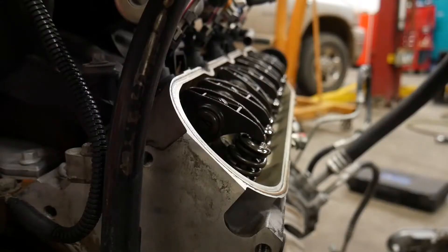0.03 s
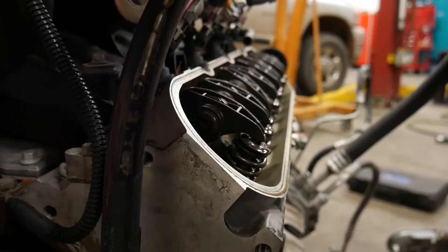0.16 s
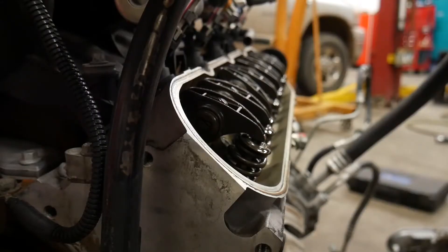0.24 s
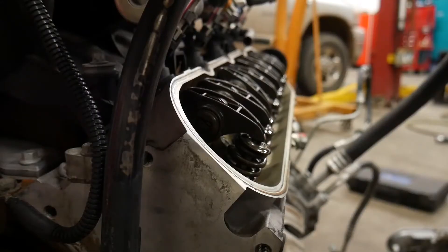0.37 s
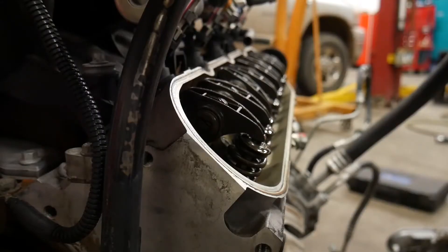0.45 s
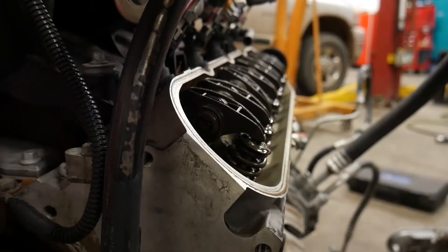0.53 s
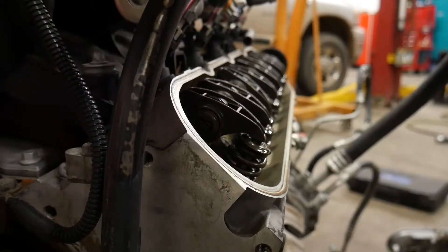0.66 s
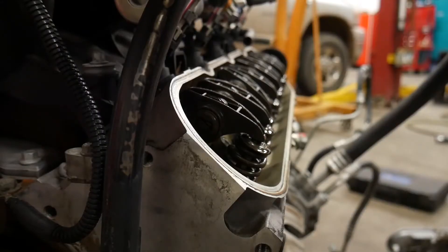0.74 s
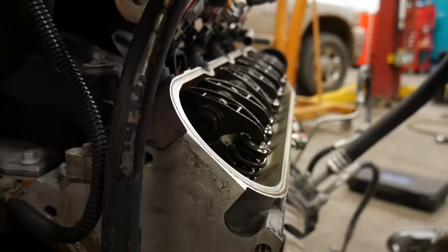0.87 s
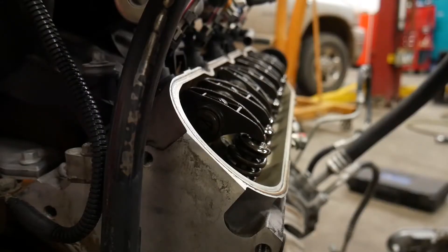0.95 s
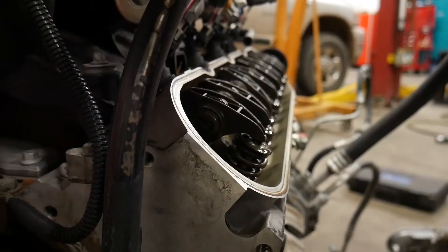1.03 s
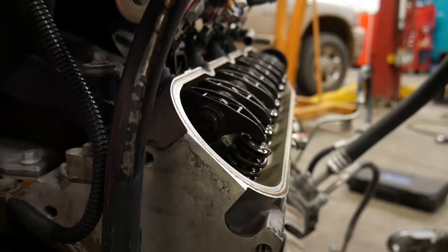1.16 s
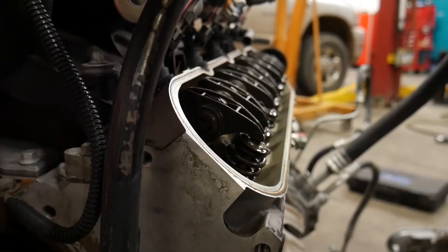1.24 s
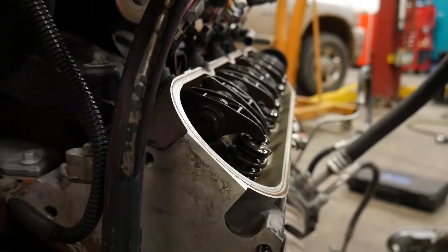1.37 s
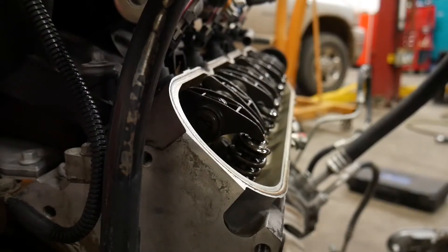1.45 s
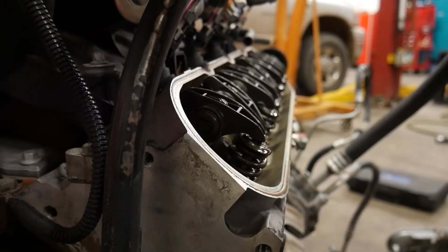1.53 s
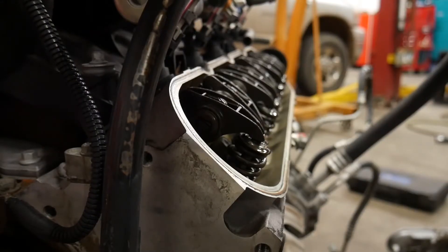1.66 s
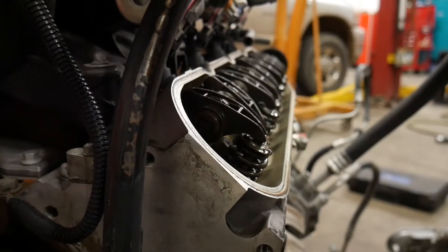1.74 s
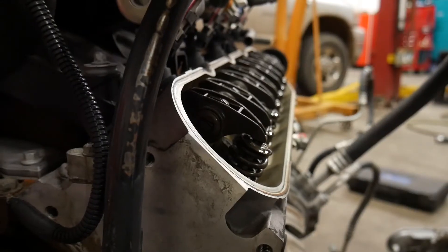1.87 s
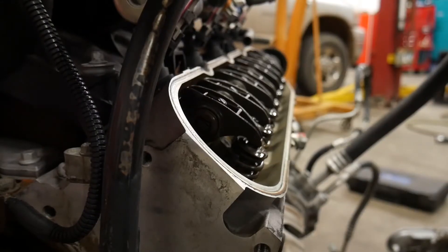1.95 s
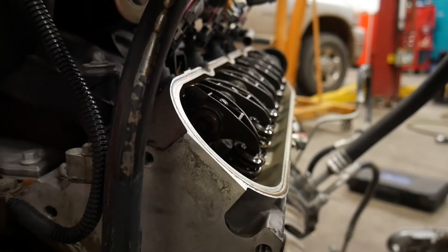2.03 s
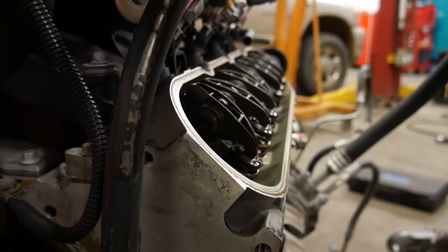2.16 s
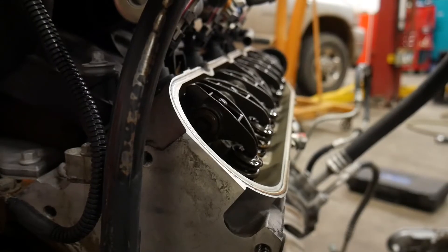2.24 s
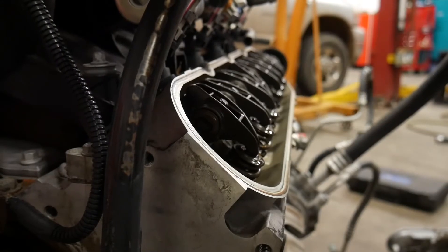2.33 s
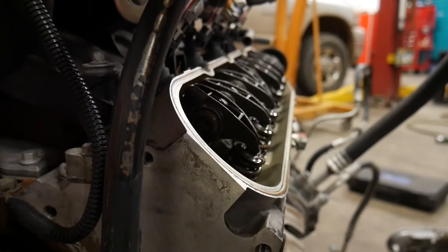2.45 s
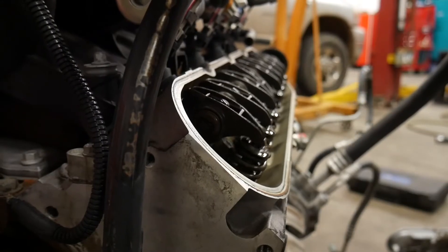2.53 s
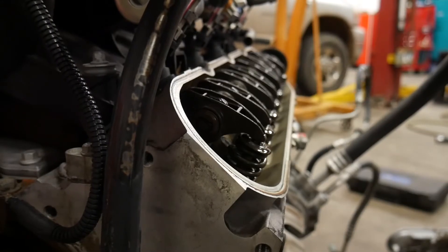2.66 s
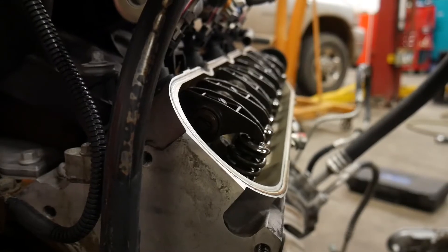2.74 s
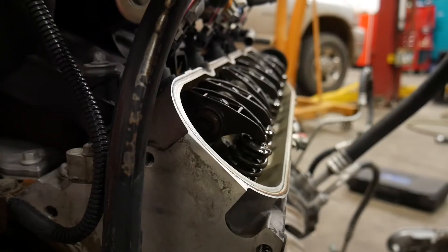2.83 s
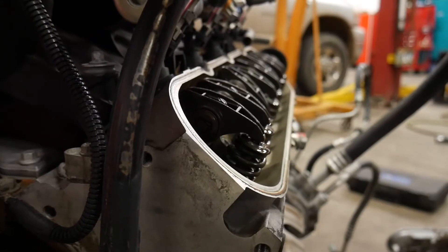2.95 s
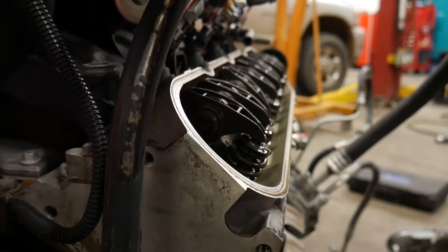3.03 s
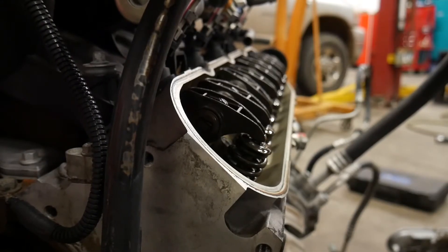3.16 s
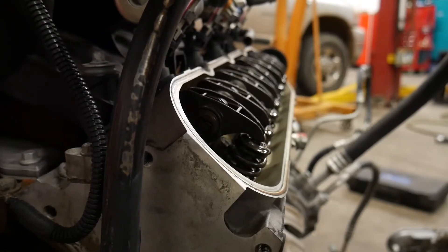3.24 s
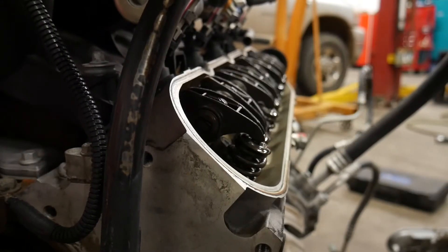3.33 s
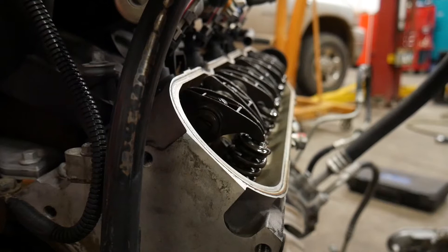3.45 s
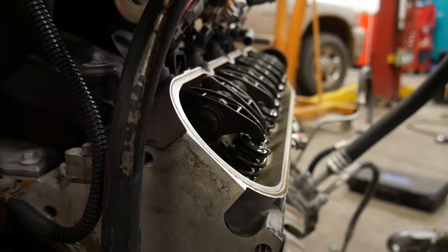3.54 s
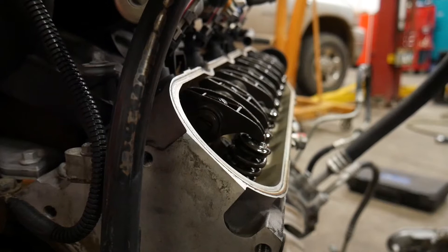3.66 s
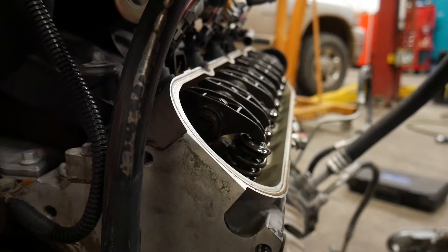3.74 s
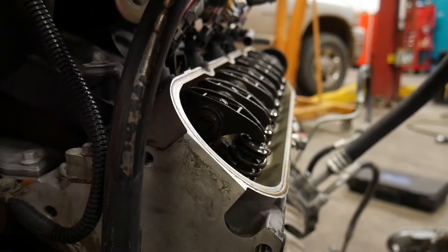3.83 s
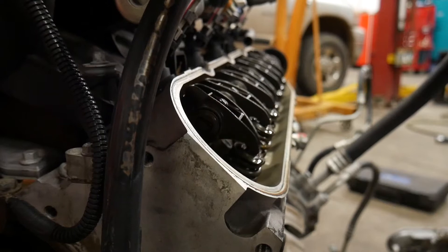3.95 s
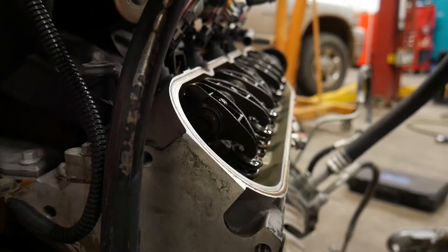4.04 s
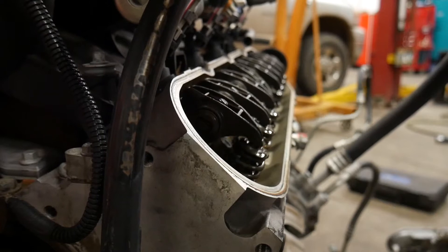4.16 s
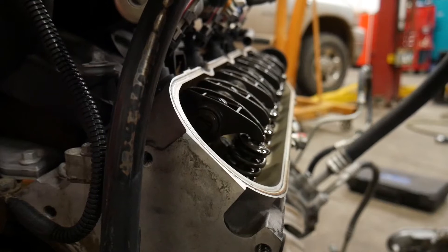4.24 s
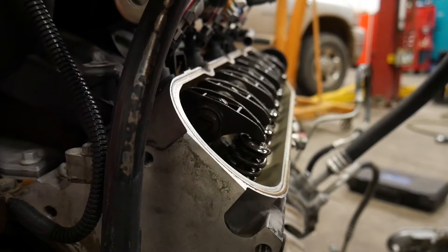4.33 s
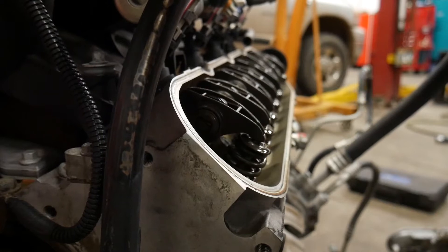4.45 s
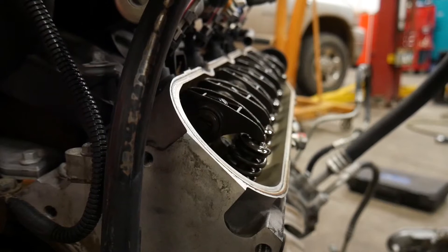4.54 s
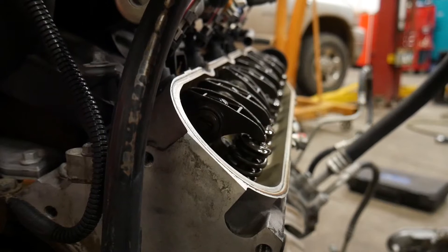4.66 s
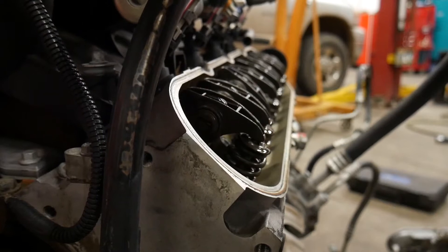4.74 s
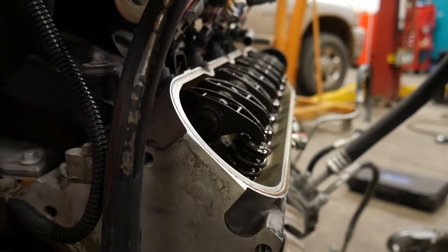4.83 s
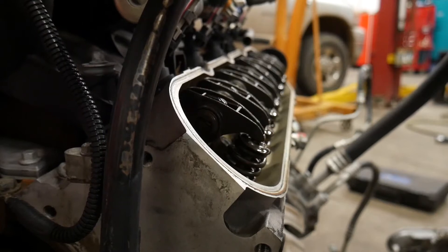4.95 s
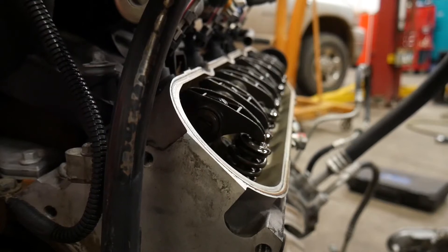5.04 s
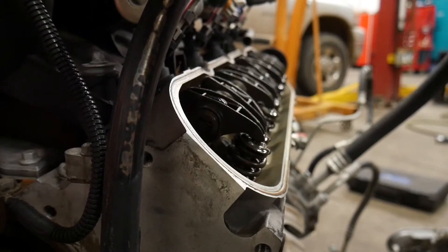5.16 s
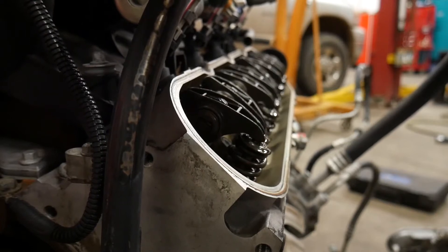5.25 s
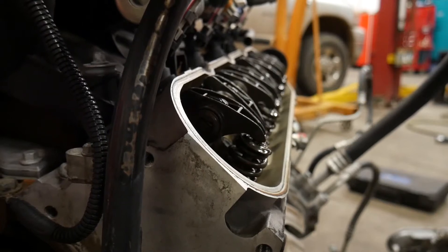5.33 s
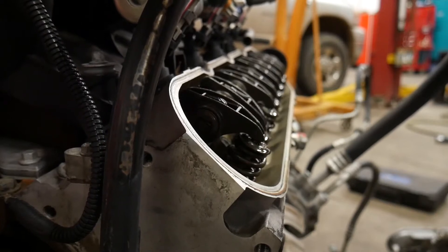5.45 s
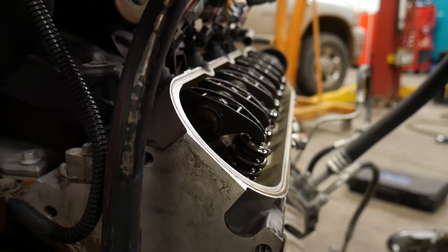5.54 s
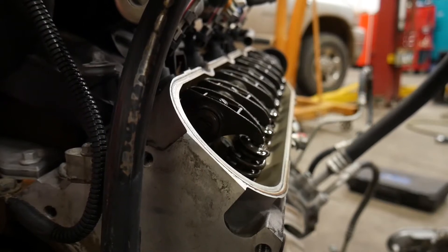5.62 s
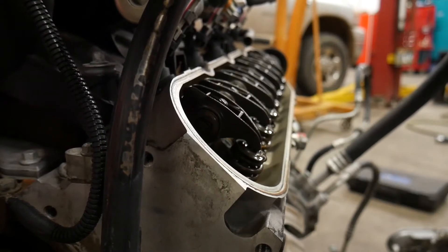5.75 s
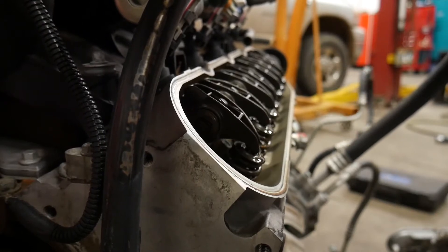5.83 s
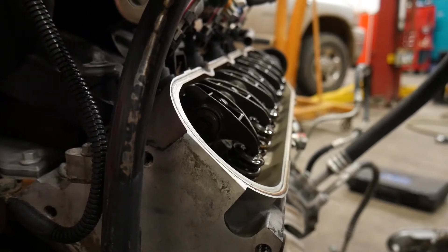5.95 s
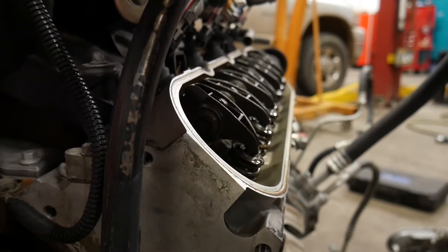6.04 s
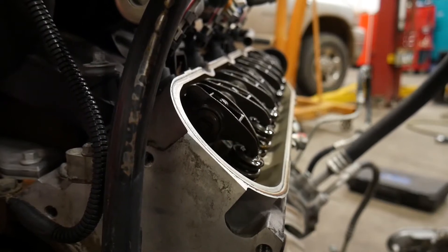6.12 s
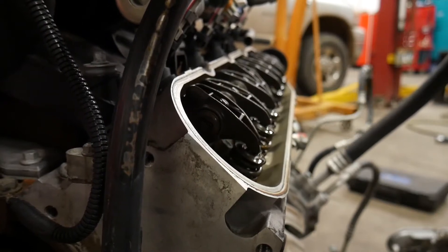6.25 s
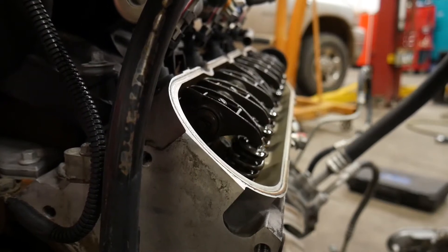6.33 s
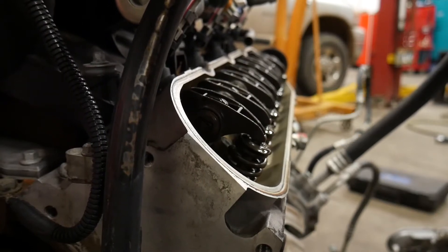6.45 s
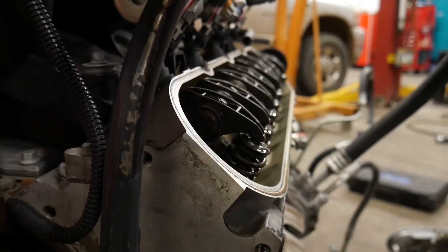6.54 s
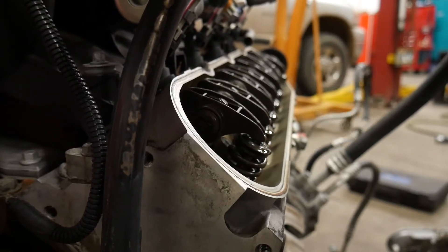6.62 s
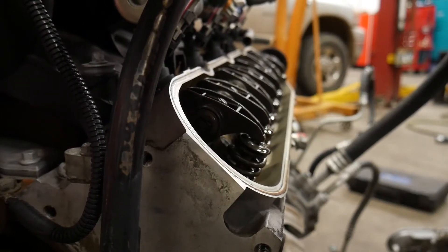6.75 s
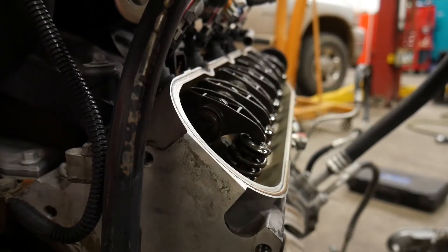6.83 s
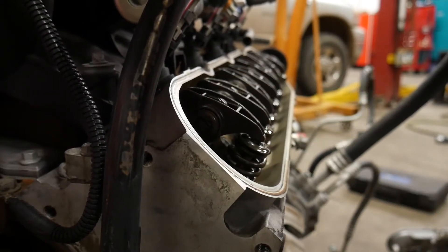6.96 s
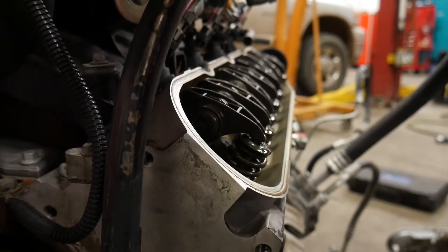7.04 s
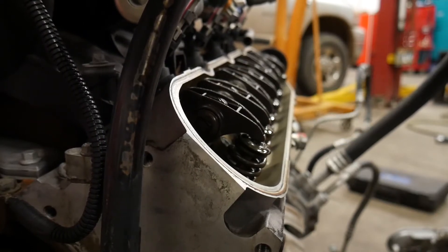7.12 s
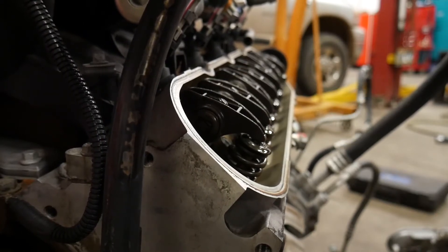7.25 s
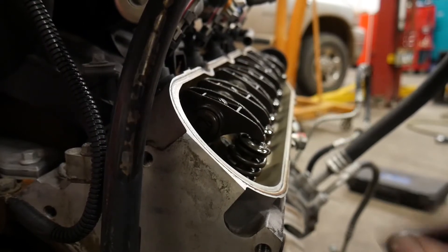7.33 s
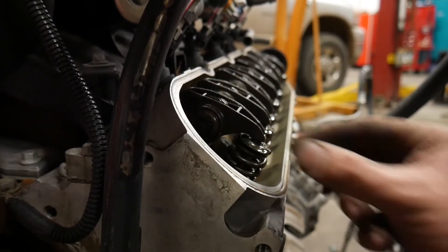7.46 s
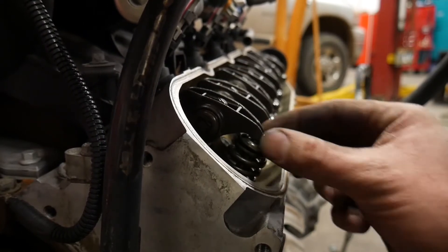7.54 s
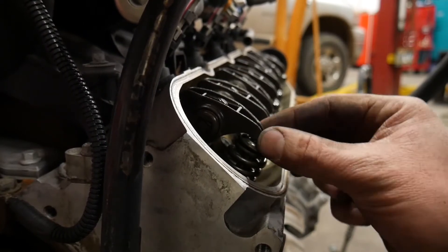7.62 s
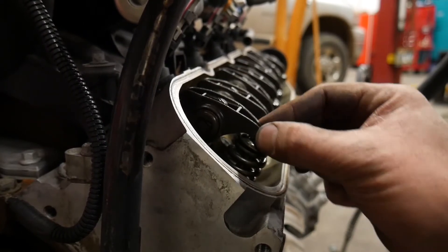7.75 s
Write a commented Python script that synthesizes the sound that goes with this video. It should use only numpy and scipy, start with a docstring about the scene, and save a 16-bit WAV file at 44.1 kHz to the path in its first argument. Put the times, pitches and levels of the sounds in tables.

```python
"""Starter bumps in a workshop

One microphone close to a V8 engine: the starter is bumped eight times and the engine never fires.
Each time the solenoid slams in, the motor whirs up, the solenoid drops out and the gears coast to rest.
Small clicks and a rustle of handling come before and after; behind it all lies the low hum of the shop."""
import sys
import numpy as np
from scipy import signal
from scipy.fft import rfft, irfft, next_fast_len
from scipy.io import wavfile
from scipy.ndimage import uniform_filter1d

SR = 44100
rng = np.random.default_rng(int(sys.argv[2]) if len(sys.argv) > 2 else 0)


def unload_audio(sound):
    """Save the sound as a 16-bit wav file, at the path given as the first command line argument."""
    columns = np.transpose(np.atleast_2d(sound))
    # keep every value between -1 and 1, then stretch to whole-number steps
    steps = np.round(np.clip(columns, -1, 1) * 32767)
    wavfile.write(sys.argv[1], SR, steps.astype(np.int16))


N = 343403
TIME = np.arange(N) / SR

# one row a bump: solenoid in/s, solenoid out/s, top gear mesh rate/Hz, slam/dB, drop-out clack/dB,
# running level/dB, dry friction as a mesh rate/Hz
BUMPS = [(1.0531, 1.174, 1083, -10.5, -19.5, -0.44, 1128), (1.7276, 1.883, 1237, -10, -20, -0.37, 944),
         (2.487, 2.633, 1231, -10.5, -20, -0.6, 899.3), (3.1538, 3.308, 1276, -10, -23.5, -0.55, 901),
         (3.8663, 4.038, 1357, -10, -18.5, -0.54, 900.4), (4.618, 4.741, 1172, -9.5, -20.5, -0.7, 898.4),
         (5.3219, 5.444, 1157, -10.5, -19, -0.5, 973.6), (6.1393, 6.271, 1140, -9.5, -18.5, -.9, 959)]


def starter(mesh, current, level_db, run_db=-24.5, knee_hz=600, bright_hz=2200, bright_db=-0.62,
            patchy_db=0.94, clatter_db=-0.09):
    """The gears sound through the starter case, louder and brighter with speed and current."""
    # broad colour of the running starter: f/Hz, level/dB
    whirr = [(40, -30), (130, -19.5), (300, -19.5), (600, -16.5), (1100, -13), (2000, -18.5), (3500, -14.5),
             (6000, -17), (9000, -15), (12000, -19.5), (15500, -26.5)]
    # resonances of the case and bell housing: f/Hz, width/Hz, lift/dB
    resonances = [(177, 93, 5), (384, 80, 6.5), (477, 49, 7.5), (678, 58, 4), (801, 62, 7.5), (902, 46, 6),
                  (1159, 137, 9.5), (1225, 98, 7), (1302, 72, 9), (1424, 58, 7.5), (1575, 110, 10),
                  (1834, 160, 5), (1990, 220, 5.5), (2242, 158, 8.5), (2610, 40, 3), (2900, 74, 8.5),
                  (3330, 33, 5), (4400, 65, 2), (5200, 160, 8.5), (6590, 170, 7), (8130, 140, 8),
                  (8400, 1400, 3), (9700, 180, 11.5), (10440, 140, 9.5), (11360, 210, 6.5)]
    # harder tooth blows sound brighter: f/Hz, power of the blow strength that the amplitude follows
    speed_law = [(100, 1.4), (500, 1.1), (1200, 1.33), (2400, 1.82), (5000, 2.48), (9500, 2.8),
                 (14000, 3.35)]
    # change at full motor current: f/Hz, level/dB
    loaded = [(100, -4), (450, 2), (780, 8.5), (1200, 3), (2400, 5), (5000, 2), (9000, -1), (14000, 2.5)]

    def case_db(hz):
        """Resonant peaks on top of the broad colour."""
        return read(whirr, hz) + sum(db / (1 + (2 * (hz - f) / width) ** 2) for f, width, db in resonances)

    case = unit(colour(gears(mesh, current), case_db))
    strength = mesh / (mesh + knee_hz)  # tooth blows harden with speed, then level off
    strength_db = 20 * np.log10(strength / np.quantile(strength, .75) + 1e-4)

    def gain_db(hz, t):
        """Speed, load and the housing's swells over frequency and time."""
        speed_db = read(speed_law, hz) * np.interp(t, TIME, strength_db)
        load_db = read(loaded, hz) * np.interp(t, TIME, current)
        swell_db = housing_swell(hz, np.interp(t, TIME, mesh))
        # the point of contact shifts, so different high resonances stand out from moment to moment
        patches = uniform_filter1d(rng.standard_normal(swell_db.shape), size=3, axis=0)
        patches = unit(uniform_filter1d(patches, size=40, axis=1))
        treble = hz ** 4 / (hz ** 4 + bright_hz ** 4)
        return speed_db + load_db + swell_db + treble * (bright_db + patchy_db * patches)

    return amp(run_db + level_db + clatter_db * wander(8)) * sweep(case, gain_db)


def motion(spin_up_power=.53, drag_per_s=1.15, surge_s=0.176):
    """The motor spins up and coasts: mesh rate/Hz, current (0-1) and running level/dB."""
    mesh, current, level_db = np.zeros((3, N))
    for on, off, top_hz, _, _, db, friction_hz in BUMPS:
        since, coasting = np.maximum(TIME - on, 0), np.maximum(TIME - off, 0)
        rising = top_hz * (since / (off - on)) ** spin_up_power
        # viscous drag plus dry friction
        falling = (top_hz + friction_hz) * np.exp(-drag_per_s * coasting) - friction_hz
        now = TIME >= on
        mesh[now] = np.where(TIME < off, rising, np.maximum(falling, 0))[now]
        current[now] = (np.exp(-(since / surge_s) ** 2) * (TIME < off))[now]  # sinks as speed builds
        level_db[now] = db
    return mesh, current, level_db


def gears(mesh, current, tones_db=-9.5, impacts_db=-7, rattle_db=-3, whine_hz=2400, whine_width_hz=350,
          firm_hz=700, roughness=0.73, knocks_per_s=260, spread_db=1.65, lumps_db=0.25):
    """Force on the case: gear tones, commutator whine, tooth impacts, brush hiss and backlash rattle."""
    # tones of the motor: multiple of the mesh rate, level/dB
    partials = [(.5, -19), (1, -10), (2, -6), (3, -5), (3.2, -11), (4, -6), (5, -10), (6, -14.5),
                (6.4, -17), (7, -15.5), (8, -18), (9, -7.5)]
    teeth = np.cumsum(mesh * (1 + .018 * wander(120))) / SR
    tones = sum(amp(db) * (1 + roughness * wander(50)) * np.cos(2 * np.pi * (k * teeth + rng.random()))
                for k, db in partials)
    tones *= np.minimum(mesh / firm_hz, 1)  # slow gears run slack and lose their pitch
    # under current the commutator sings, loudest as its pitch crosses a resonance of the motor
    bars_per_tooth = 3.2
    bar_hz = bars_per_tooth * mesh
    sing = np.exp(-((bar_hz - whine_hz) / whine_width_hz) ** 2)
    sing += 0.6 * np.clip(bar_hz / whine_hz - 1, 0, 1)
    whine = current * sing * np.cos(2 * np.pi * bars_per_tooth * teeth)
    whine *= amp(-6) * (2 + roughness * wander(200))
    impacts = unit(np.diff(np.floor(teeth), prepend=0) * rng.standard_normal(N))
    # each knock of the backlash is a scrape of a millisecond or two
    knocks = (rng.random(N) < knocks_per_s / SR) * amp(spread_db * np.minimum(rng.exponential(1, N), 4))
    scrapes = signal.lfilter([1], [1, -np.exp(-1 / (0.002 * SR))], knocks)
    rattle = unit(scrapes * rng.standard_normal(N))
    shaft = 1 + 0.07 * np.cos(np.pi * teeth / 2)  # the load swings once every four teeth
    hiss = rng.standard_normal(N)
    grind = hiss + amp(impacts_db) * impacts + amp(rattle_db) * rattle
    return unit(grind * shaft * amp(lumps_db * wander(35))) + amp(tones_db) * tones + whine


def housing_swell(hz, mesh, ring_hz=1200, octaves=0.21, swell_db=0.5):
    """Gain/dB round the bell housing's ring: up when a gear harmonic sits on it, down between two."""
    near = np.exp(-(np.log2((hz + 1) / ring_hz) / octaves) ** 2)
    harmonic = ring_hz / np.maximum(mesh, 1)
    distinct = np.exp(-(harmonic / 9.5) ** 4)  # high harmonics crowd together and blur the swells
    return swell_db * near * distinct * np.cos(2 * np.pi * harmonic)


def after_ring(x):
    """Lightly damped steel parts, shaken by the sound x, ring on after the gears stop."""
    # modes of the steel parts: f/Hz, level/dB, t60/s
    modes = [(880, -23.5, 1.0), (2400, -23, 1.0)]
    t = np.arange(SR) / SR
    ring = sum(amp(db - 60 * t / t60) * np.sin(2 * np.pi * hz * t) for hz, db, t60 in modes)
    return x + signal.fftconvolve(x, ring / np.sqrt(SR))[:N]


def solenoid(relay_lead_s=0.0277, relay_db=-43.5, ring_db=-9, rebound_s=.012, rebound_db=-5):
    """A relay ticks, the plunger slams home and rings; on release it clacks back with one rebound."""
    # colour of the slam: f/Hz, level/dB
    slam = [(30, -27.5), (65, -18), (110, -22.5), (200, -17), (600, -12), (1150, -3.5), (1740, -10),
            (2320, -5), (2880, -8.5), (3850, -20), (7400, -17), (11100, -13.5), (15500, -21)]
    # colour of the drop-out clack: f/Hz, level/dB
    clack = [(50, -8.5), (110, 2.5), (300, -2.5), (900, 2), (2000, -3.5), (5000, -19), (10000, -1.5),
             (15000, -6)]
    # modes of the struck solenoid: f/Hz, level/dB, t60/s
    modes = [(395.3, -6, 0.11), (580, -9.5, 0.038), (870, -15, 0.21), (1093, 2.5, 0.12), (1090, -7.5, 0.11),
             (1297, -1, 0.11), (1416, -4, 0.099), (1480, -12, 0.023), (1737, -10.5, 0.29),
             (1940, 1.5, 0.05), (2226, -7, 0.054), (2430, 3.5, 0.026), (2852, -3.5, 0.056)]
    t, out = np.arange(SR // 5) / SR, np.zeros(N)
    ring = sum(amp(db - 60 * t / t60) * np.sin(2 * np.pi * hz * t) * rng.choice([-1, 1])
               for hz, db, t60 in modes)
    for on, off, _, slam_db, clack_db, _, _ in BUMPS:
        add(out, on - relay_lead_s, amp(relay_db) * click(centre_hz=1750, octaves=1.0, t60=0.015))
        add(out, on, amp(slam_db) * (amp(ring_db) * ring + crack(slam, chatter_s=.003)))
        for s, db in (off, clack_db), (off + rebound_s, clack_db + rebound_db):
            add(out, s, amp(db) * crack(clack, chatter_s=.0056))
    return out


def crack(spectrum, chatter_s):
    """Steel meets steel, chatters for some ms and dies away; rms 1 at its start."""
    # decay of the crack: f/Hz, t60/s
    decay = [(100, 0.092), (1000, 0.03), (3000, 0.041), (6000, 0.03), (14000, 0.028)]
    noise = rng.standard_normal(SR // 5)
    burst = sweep(noise, lambda hz, t: -60 * np.maximum(t - chatter_s, 0) / read(decay, hz))
    burst = colour(burst, lambda hz: read(spectrum, hz))
    return burst / np.std(burst[:SR // 200])


def groans(sag=0.048):
    """Short low hums swell and sag a little in pitch while the gears coast."""
    # one row a hum: middle/s, length/s, f/Hz, level/dB
    hums = [(1.35, 0.25, 191.3, -45.5), (2.679, 0.13, 170, -45), (4.529, .2, 199.6, -50),
            (4.932, 0.14, 191, -46.5), (5.06, .1, 155.6, -46.5), (5.214, 0.19, 168.1, -40),
            (6.66, 0.28, 192, -48)]
    out = np.zeros(N)
    for s, length, hz, db in hums:
        place = np.linspace(-.5, .5, round(length * SR))
        tone = np.sqrt(2) * np.sin(2 * np.pi * np.cumsum(hz * (1 - sag * place)) / SR)
        add(out, s - length / 2, amp(db) * np.cos(np.pi * place) ** 2 * tone)
    return out


def handling(rustle_db=-3.5, grain_db=4.0):
    """Handling near the microphone: a faint grainy rustle at first, and scattered dry clicks."""
    # course of the rustle: t/s, level/dB
    course = [(0, -68), (.1, -65), (.23, -74), (.27, -52), (.34, -55.5), (.44, -57.5), (.46, -78),
              (.56, -86)]
    # colour of the rustle: f/Hz, level/dB
    spectrum = [(900, -20.5), (1600, -4.5), (2500, 2), (4500, -14.5), (6000, -5.5), (10000, -7.5),
                (15000, -8)]
    # small clicks: t/s, level/dB, centre/Hz, width/octaves, t60/s
    clicks = [(0.056, -62, 2900, 1.6, 0.017), (0.2085, -46.5, 600, 0.57, .018),
              (0.208, -59, 7500, 0.3, .02), (.260, -58, 8200, 1.1, .05), (0.286, -42, 5600, 3.1, 0.025),
              (.403, -49.5, 7500, 1.7, 0.0414), (.430, -62, 5000, 1.4, .06), (.507, -56, 10200, 0.7, 0.028),
              (.776, -68, 10600, 2.7, .03), (0.942, -56, 5890, 4.2, 0.013), (2.433, -37.5, 1410, 1.3, .02),
              (7.1, -62, 9000, .8, .2), (7.124, -52.5, 1900, 1.0, 0.032), (7.198, -35.5, 1800, 0.56, 0.029),
              (7.22, -58, 8900, 0.78, .04), (7.251, -40, 764, 0.67, 0.021), (7.267, -62, 2500, 0.53, .04)]
    grains = rng.standard_normal(N) * amp(grain_db * wander(150))
    rustle = unit(colour(grains, lambda hz: read(spectrum, hz)))
    out = rustle * amp(rustle_db + np.interp(TIME, *np.transpose(course), right=-120))
    for s, db, *shape in clicks:
        add(out, s, amp(db) * click(*shape))
    return out


def click(centre_hz, octaves, t60):
    """A small dry click in one band; rms 1 at its start."""
    t = np.arange(SR // 8) / SR
    burst = rng.standard_normal(len(t)) * amp(-60 * t / t60)
    away = lambda hz: abs(np.log2((hz + 1) / centre_hz))
    sound = colour(burst, lambda hz: -10 * np.log10(1 + (away(hz) / octaves) ** 4) - 3 * away(hz))
    return sound / np.std(sound[:SR // 200])


def reach():
    """A hand and sleeve brush softly past, reaching in towards the valve springs."""
    # course of the brushing: t/s, level/dB
    course = [(7.0, -88), (7.1, -73), (7.17, -81), (7.3, -73), (7.55, -75), (7.68, -92)]
    # colour of the brushing: f/Hz, level/dB
    spectrum = [(900, -20.5), (1800, -4), (2800, 4.5), (4300, -12), (9000, -12), (15000, -17.5)]
    brush = unit(colour(rng.standard_normal(N), lambda hz: read(spectrum, hz)))
    return brush * amp(np.interp(TIME, *np.transpose(course), left=-120))


def room(x, wet_db=-21):
    """Close to the engine, the workshop walls add only a weak diffuse tail."""
    # reverberation of the workshop: f/Hz, t60/s
    decay = [(100, 0.44), (1000, 0.4), (4000, 0.23), (14000, 0.09)]
    tail = sweep(rng.standard_normal(SR), lambda hz, t: -60 * t / read(decay, hz))
    tail[:SR // 100] = 0  # reflections reach the microphone 10 ms late
    return x + amp(wet_db) * signal.fftconvolve(x, tail / np.linalg.norm(tail))[:N]


def shop(hum_db=-2, waver=0.43):
    """Room tone of the workshop: low rumble and a wavering hum."""
    # colour of the rumble: f/Hz, level/dB
    spectrum = [(20, -19.5), (55, -12.5), (80, -9), (98, -17), (122, -11), (168, -24.5), (300, -30),
                (500, -28), (580, -32.5), (880, -29), (1330, -37.5), (2200, -47), (4600, -50.5),
                (13000, -50), (15800, -55)]
    # course of the rumble: t/s, level/dB
    course = [(0, -53), (.7, -57), (6.2, -53), (7, -51.5), (7.79, -54.5)]
    # tones of the hum: f/Hz, relative level/dB
    tones = [(60, -58), (118.4, -61.5)]
    rumble = unit(colour(rng.standard_normal(N), lambda hz: read(spectrum, hz)))
    hum = sum(amp(db + hum_db) * np.sqrt(2) * (1 + waver * wander(6)) * np.sin(2 * np.pi * hz * TIME)
              for hz, db in tones)
    return rumble * amp(np.interp(TIME, *np.transpose(course))) + hum


def amp(db):
    """Decibels to gain."""
    return 10 ** (np.asarray(db) / 20)


def unit(x):
    """Scales to rms 1."""
    return x / np.sqrt(np.mean(x ** 2) + 1e-20)


def read(points, hz):
    """Reads a table on a log-frequency axis."""
    f, value = np.transpose(points)
    return np.interp(np.log(hz + 1), np.log(f + 1), value)


def add(mix, s, sound):
    """Mixes a sound in at time s."""
    part = mix[max(round(s * SR), 0):][:len(sound)]
    part += sound[:len(part)]


def colour(x, db_at, size=8192):
    """Causal filter whose gain in dB is the function db_at(Hz)."""
    hz = abs(np.fft.fftfreq(size, 1 / SR))
    log_gain = np.log(amp(np.maximum(db_at(hz), -100)))
    taps = np.fft.ifft(np.exp(np.conj(signal.hilbert(log_gain)))).real[:size // 2]  # minimum phase
    return signal.oaconvolve(x, taps)[:len(x)]


def sweep(x, db_at):
    """Moving filter whose gain in dB is the function db_at(Hz, s)."""
    hz, t, frames = signal.stft(x, SR, nperseg=256, noverlap=192)
    return signal.istft(frames * amp(db_at(hz[:, None], t)), SR, nperseg=256, noverlap=192)[1][:len(x)]


def wander(hz):
    """Random drift of rms 1, rolled off above hz."""
    size = next_fast_len(N)
    spectrum = rfft(rng.standard_normal(size)) * np.exp(-(np.fft.rfftfreq(size, 1 / SR) / hz) ** 2)
    return unit(irfft(spectrum, size)[:N])


def scene():
    """Starter, solenoid and handling up close, the workshop behind them; mono."""
    close = after_ring(starter(*motion())) + groans() + solenoid() + handling() + reach()
    return (room(close) + shop())[None]


def record(dry):
    """The microphone chain softly rounds off the slams and cuts the highest treble."""
    ceiling, edge_hz = .85, 15950
    rounded = ceiling * np.tanh(dry / ceiling)
    lowpass = signal.firwin(401, edge_hz, window=("kaiser", 8), fs=SR)
    return signal.oaconvolve(rounded, lowpass[None], "same")


dry = scene()
out = record(dry)
unload_audio(out)
```